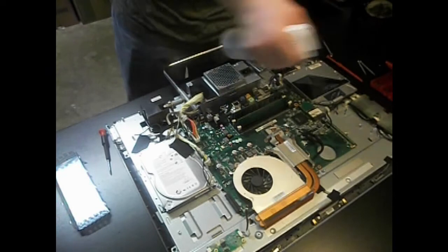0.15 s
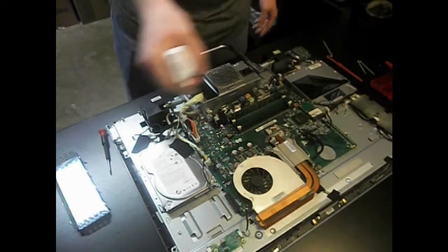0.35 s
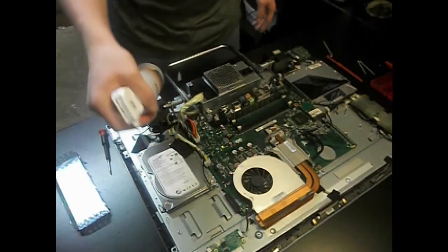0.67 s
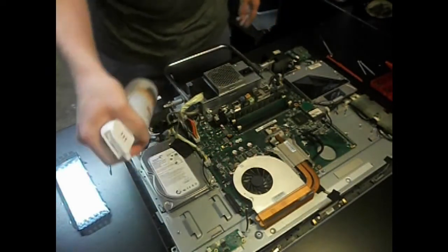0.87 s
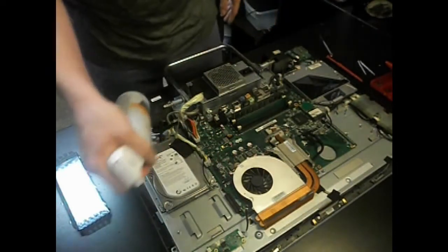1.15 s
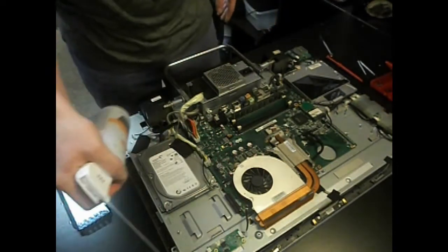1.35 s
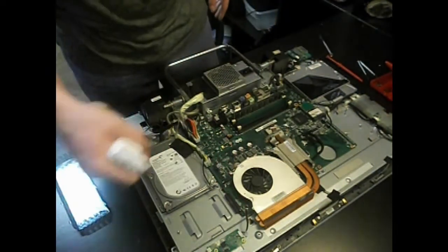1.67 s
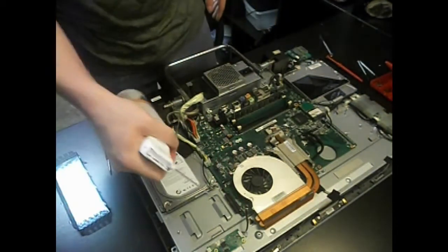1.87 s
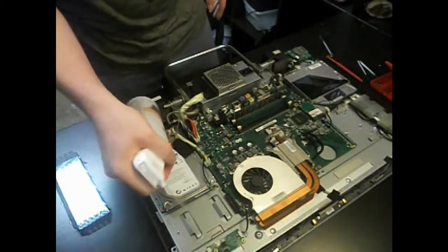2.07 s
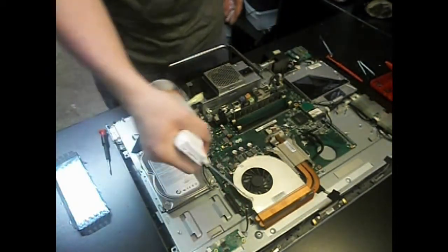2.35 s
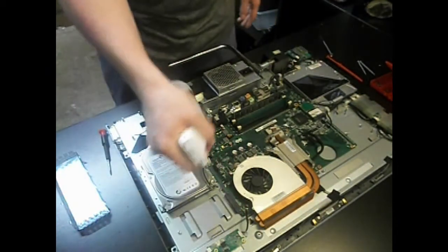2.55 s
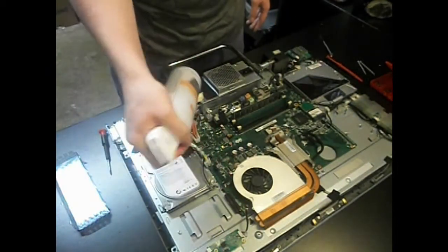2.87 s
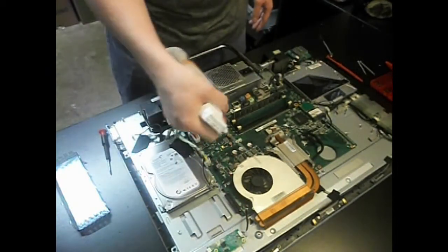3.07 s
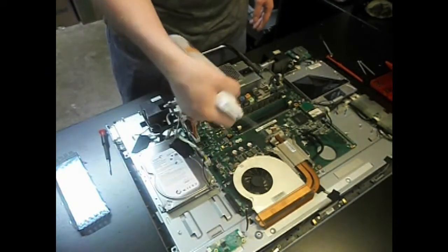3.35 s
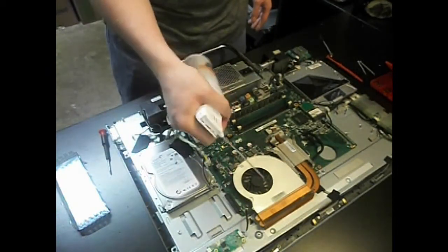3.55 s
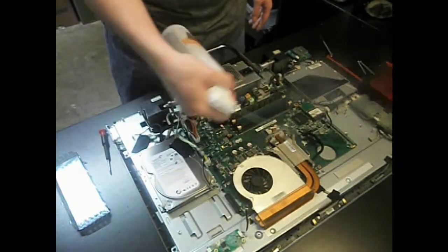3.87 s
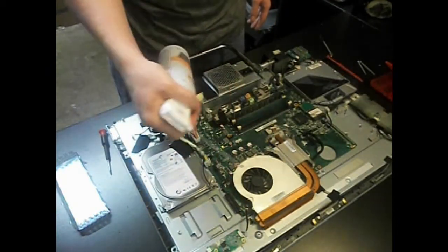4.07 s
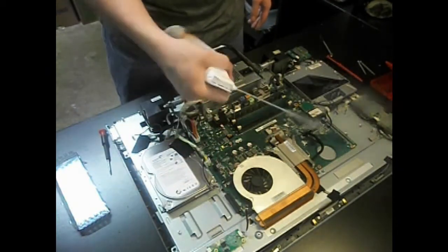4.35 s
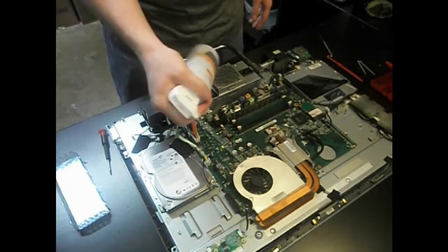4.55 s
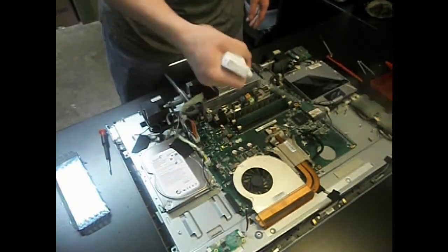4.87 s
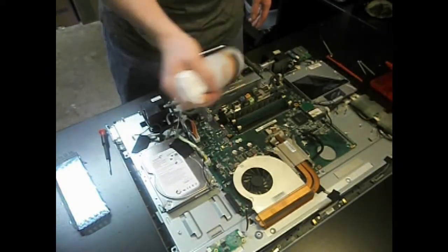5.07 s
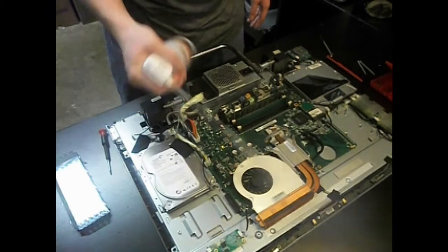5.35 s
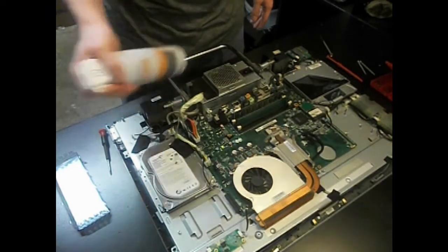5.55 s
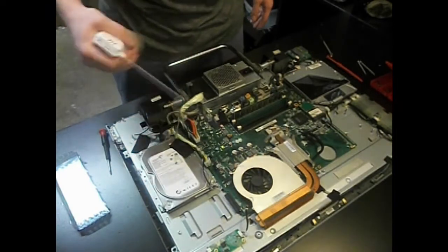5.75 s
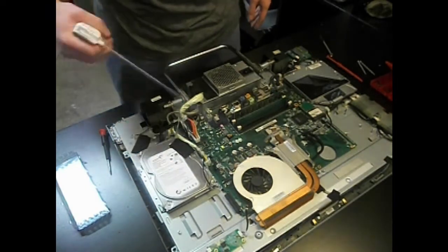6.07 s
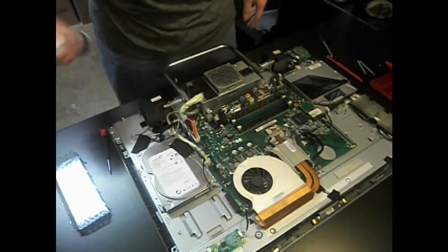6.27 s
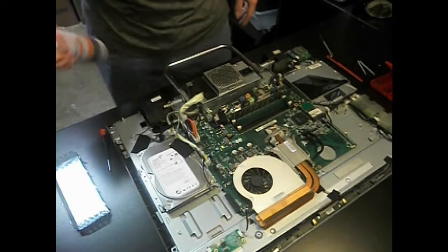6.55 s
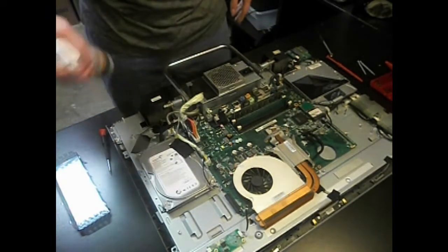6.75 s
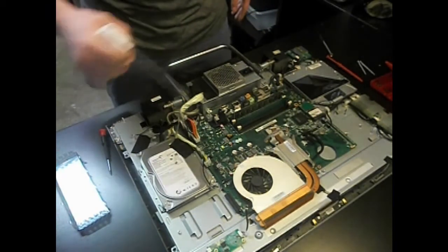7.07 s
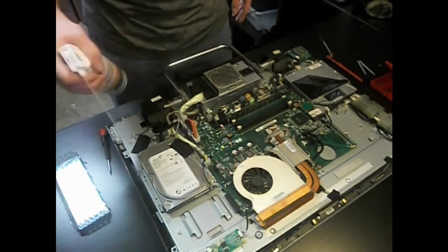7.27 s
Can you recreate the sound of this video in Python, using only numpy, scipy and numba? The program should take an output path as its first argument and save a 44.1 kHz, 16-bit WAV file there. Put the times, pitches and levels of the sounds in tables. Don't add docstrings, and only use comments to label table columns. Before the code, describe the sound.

Indoors, close to a basic camera microphone, an air duster spits abrupt jabs of air, some faint, others harsh and overloaded, with brief quiet room noise between. The jet scrapes over board edges, whistles through slots and buffets thin metal. After a longer puff it opens into a continuous, softer, fluttering hiss that rises and falls to the end, with a few light knocks late on.

```python
import sys
import numpy as np
from scipy import signal
from scipy.fft import rfft, irfft
from scipy.io import wavfile
from scipy.ndimage import uniform_filter1d
from numba import njit

SR = 44100
rng = np.random.default_rng(int(sys.argv[2]) if len(sys.argv) > 2 else 0)


def wrap_up_sound(samples):
    columns = np.atleast_2d(samples).T
    tamed = np.clip(columns, -1, 1)
    steps = np.round(tamed * 32767).astype(np.int16)
    wavfile.write(sys.argv[1], SR, steps)


def rack_gain(trim_db):
    fader = np.asarray(trim_db, float)
    return 10 ** (fader / 20)


N = 327222
HZ = np.fft.rfftfreq(N, 1 / SR)
MS = np.arange(N * 1000 // SR + 2) / 1000


def unit(x):
    return x / np.sqrt(np.mean(x ** 2))


def bump(hz, width_hz, db):
    return rack_gain(db / (1 + (2 * (HZ - hz) / width_hz) ** 2))


def coloured(points, body=1):
    hz, db = np.transpose(points)
    gain = rack_gain(np.interp(np.log(HZ + 1), np.log(hz), db))
    return unit(irfft(rfft(rng.standard_normal(N)) * gain * body, N))


def walk(rate_hz):
    hold = int(SR / rate_hz)
    steps = np.repeat(rng.standard_normal(N // hold + 1), hold)
    return unit(uniform_filter1d(uniform_filter1d(steps, hold), hold)[:N])


def patchy(x, edges_hz, rate_hz, patchy_db):
    spectrum = rfft(x)
    band = np.searchsorted(edges_hz, HZ)
    out = np.zeros(N)
    for k in range(len(edges_hz) + 1):
        out += rack_gain(patchy_db * walk(rate_hz)) * irfft(spectrum * (band == k), N)
    return out


@njit
def svf(x, hz, q):
    y, band, low = np.empty(len(x)), 0., 0.
    for i in range(len(x)):
        g = np.tan(np.pi * hz[i] / SR)
        v = (band + g * (x[i] - low)) / (1 + g * (g + 1 / q))
        band, low, y[i] = 2 * v - band, low + 2 * g * v, v / q
    return y


def smooth(control):
    return np.interp(np.arange(N) / SR, MS, control)


def pull(rows, attack_s):
    full, held, first, last, fade = np.transpose(rows)[:, :, None]
    db = first + (last - first) * np.clip((MS - full) / np.maximum(held, 0.005), 0, 1)
    db = db - 40 * (np.maximum(full - MS, 0) / attack_s) ** 1.3
    db = db - fade * np.maximum(MS - full - held, 0)
    return np.sum(rack_gain(2 * db), axis=0)


def crossing(rows):
    middle, length = np.transpose(rows)[:2, :, None]
    return np.exp(-np.abs(2 * (MS - middle) / length) ** 3.05)


def extra(rows):
    return np.transpose(rows)[2] @ crossing(rows)


def valve_flow():
    # full_s, held_s, first_db, release_db, fade_db_per_s
    puff_rows = [
        (-.01, 0.057, -26, -30.5, 480),
        (.205, .075, -33, -29.5, 500),
        (.775, 0.081, -16, -18.5, 320),
        (1.08, .11, -16.5, -21, 600),
        (2.318, .1, -12.5, -14, 300),
        (2.685, 0.099, -11, -17, 362),
        (3.03, 0.23, -16, -18, 280),
    ]
    # full_s, held_s, first_db, release_db, fade_db_per_s
    snap_rows = [
        (.478, 0.091, -15.5, -16.5, 620),
        (1.347, 0.094, -16, -19, 520),
        (1.632, 0.085, -13, -10.5, 348),
        (1.95, 0.13, -13.5, -13.5, 389),
        (3.62, 0.087, -15.5, -13.5, 200),
    ]
    # full_s, held_s, first_db, release_db, fade_db_per_s
    swell_rows = [
        (3.74, 0.12, -21.5, -21.5, 450),
        (4.19, 0.18, -21, -19.5, 330),
        (4.77, 0.098, -21.5, -18, 80),
        (5.195, 0.61, -21, -23.5, 500),
        (5.52, 0.28, -26, -25, 280),
        (6.064, 0.093, -25.5, -25, 150),
        (6.2, 0.067, -23, -17.5, 39.6),
        (6.63, 0.26, -24, -24, 100),
        (6.95, .06, -19.5, -19.5, 60),
        (7.36, 0.15, -26, -15.5, 50),
    ]
    # full_s, held_s, first_db, release_db, fade_db_per_s
    held_rows = [
        (3.4, 0.2, -51.5, -56, 100),
        (3.89, 0.37, -27, -31, 100),
        (4.4, 0.53, -28, -27.5, 100),
        (4.98, 0.178, -28.5, -25, 300),
        (5.87, .11, -39.5, -35.5, 60),
        (6.03, 0.55, -27, -29, 100),
        (6.6, 0.98, -27.5, -30.5, 50),
    ]
    # middle_s, length_s, flow_db
    surge_rows = [ (.478, 0.013, 9), (.494, 0.021, 8), (1.9, 0.0095, 4), (2.065, .025, -3),
                  (2.428, 0.011, 7), (2.565, .008, 8), (3.1, .006, 6), (1.965, 0.026, 1.5),
                  (1.35, .03, 1.5), (5.7, 0.18, -2), (3.69, .03, 2.5), (4.86, .06, -2), (4.4, .03, -3),
                  (6.05, .06, -2), (6.62, .04, -2), (4.28, .1, 1.5), (.543, .02, 2.5), (.807, .018, 3.5),
                  (2.648, 0.014, 7.5), (1.673, 0.0092, 3), (1.377, .012, 1.5), (0.66, .016, 4.5),
                  (1.075, .016, 1.5), (7.28, 0.14, 2.5), (1.44, 0.043, 8), (1.69, 0.013, -3.5),
                  (1.72, 0.015, 1), (2.035, 0.043, 3), (2.335, 0.034, 2.5), (.175, 0.02, 7),
                  (3.0, 0.014, 2), (2.37, 0.019, -4), (2.412, 0.024, 7), (2.48, 0.049, 4.5),
                  (2.69, 0.016, 4), (3, 0.025, 1.5), (3.1, 0.06, 4), (3.157, 0.042, 7.5),
                  (3.715, 0.024, -6.5), (5.18, 0.022, -5.5), (5.497, 0.03, -5.5), (5.585, 0.022, 1),
                  (.25, 0.064, 3.5), (1.65, 0.046, 2), (6.16, 0.036, -3.5), (6.28, 0.044, -1.5),
                  (6.56, 0.095, -3.5)]
    shut_db = -80
    power = pull(snap_rows, attack_s=0.04) + pull(puff_rows, attack_s=0.06)
    power += pull(swell_rows, attack_s=0.094) + pull(held_rows, attack_s=0.094)
    return 10 * np.log10(power + rack_gain(2 * shut_db)) + extra(surge_rows)


def controls():
    # middle_s, length_s, scrape_db
    edge_rows = [ (.51, 0.083, -9.5), (.83, 0.15, 13.5), (1.125, 0.12, 8), (1.35, 0.094, 7),
                 (1.63, 0.022, -12), (1.8, .12, 12.5), (1.945, 0.15, 9.5), (2.13, 0.12, 10.5),
                 (2.34, 0.055, -6), (2.385, 0.049, 10), (2.5, 0.18, 5), (2.76, 0.23, 7.5),
                 (3.17, 0.26, 4.5), (3.03, .07, 7), (2.9, 0.12, 9), (3.615, 0.04, 12.5), (3.8, 0.16, 5),
                 (4.3, 0.122, 4), (5.22, 0.079, 4.5), (5.66, 0.32, 3), (6.22, 0.11, 2.5), (7.0, 0.11, -2),
                 (7.26, 0.19, 3), (6.56, 0.084, 1), (.25, .1, -0.5), (3.685, 0.025, 8), (4.65, .15, 1),
                 (3.1, 0.023, 7), (3.157, 0.022, 3), (5.4, 0.1, 0.5), (2.69, 0.027, 1)]
    # middle_s, length_s, whoosh_db, pitch_hz
    gap_rows = [ (.03, .1, 6, 1150), (.21, 0.07, 9, 1090), (.52, 0.075, -4.5, 1500), (.83, 0.24, 14, 1900),
                (1.123, 0.096, 19.5, 1140), (1.36, 0.087, 18, 1210), (1.74, 0.11, 7.5, 1400),
                (1.946, 0.12, 14, 1800), (2.14, .08, 17.5, 1400), (2.31, .04, 6, 1240),
                (2.382, 0.042, 16, 1660), (2.5, 0.075, 17, 1500), (2.78, 0.2, -6, 2000),
                (3.039, 0.12, 13, 1330), (3.128, 0.032, 6, 860), (3.27, 0.12, 9, 850),
                (3.619, 0.06, 22, 1187), (3.78, 0.21, 12, 855), (3.98, 0.17, 7.5, 1080),
                (4.26, .18, 10, 900), (4.82, 0.24, 13, 880), (5.2, 0.098, 1.5, 2000), (5.55, 0.12, 8, 980),
                (5.71, 0.29, 12.5, 930), (6.57, .08, -5, 1400), (6.2, 0.067, 6.5, 920),
                (6.3, 0.28, 3, 1520), (4.6, 0.22, 3.5, 1200), (6.88, 0.15, 6, 1130),
                (7.125, 0.078, 10.5, 850), (7.352, 0.066, 3.5, 980)]
    # middle_s, length_s, buffet_db
    panel_rows = [ (.02, .06, 3), (.79, 0.31, 6), (1.13, 0.11, 12.5), (1.63, 0.032, -4), (1.946, .08, 10.5),
                  (2.1, .06, -11), (2.316, .04, 7.5), (2.659, 0.032, 13), (2.86, 0.31, -23),
                  (3.13, 0.093, 18.5), (3.24, 0.15, 17.5), (3.617, .06, 12), (3.78, 0.18, 23),
                  (4.24, 0.15, 25), (4.4, 0.11, 6.5), (1.378, 0.018, 13.5), (4.81, .18, 20),
                  (5.33, 0.15, 7.5), (5.56, 0.11, 10.5), (5.74, 0.25, 11.5), (6.2, 0.081, 11.5),
                  (6.3, 0.29, 7.5), (6.9, 0.11, 5), (7.07, 0.35, 8.5), (6.57, .08, -6), (7.352, 0.086, 9)]
    edge_db, gap_db, panel_db = -12, -12, -13
    panel_top_db, gap_hz = -45.5, 1400
    flow_db = valve_flow()
    buffet_db = -10 * np.log10(rack_gain(-2 * (flow_db + panel_db)) + rack_gain(-2 * panel_top_db)) + extra(panel_rows)
    scrape_db = flow_db + edge_db + extra(edge_rows)
    hollow_db = flow_db + gap_db + extra(gap_rows)
    pitch_hz = gap_hz + (np.transpose(gap_rows)[3] - gap_hz) @ crossing(gap_rows)
    return map(smooth, (flow_db, scrape_db, hollow_db, buffet_db, pitch_hz))


def free_jet(jet_db, eddies_db):
    # hz, level_db per Hz
    jet_spectrum = [(2500, -64), (3400, -35), (4300, -12), (5200, -3.5), (6400, 4), (7300, 4), (8000, 3.5),
                    (8400, -40)]
    hiss = patchy(coloured(jet_spectrum), np.geomspace(5200, 7500, num=5), rate_hz=13, patchy_db=1.13)
    return rack_gain(jet_db + 4.5 + eddies_db + 0.46 * walk(16)) * hiss


def edge_scrape(scrape_db, eddies_db, chassis):
    # hz, level_db per Hz
    scrape_spectrum = [(1500, -27), (2300, -2.5), (2800, -2), (3200, -2), (4200, 1), (5200, -6.5),
                       (7000, -27)]
    rasp = coloured(scrape_spectrum, chassis)
    rasp = patchy(rasp, np.geomspace(2700, 4600, num=4), rate_hz=22, patchy_db=1.5)
    return rack_gain(scrape_db + 0.3 + eddies_db + 0.93 * walk(22)) * rasp


def hollow_whoosh(hollow_db, jet_db, hollow_hz, eddies_db, chassis):
    wake = coloured([(330, -24.5), (700, -1.0), (1100, 2), (2200, -2.5), (2600, 2), (4000, -36.5)], chassis)
    depth = np.clip((hollow_db - jet_db + 9.5) / 16, 0, 1)
    pitched = svf(wake, np.clip(hollow_hz, 300, 4000), 1.17)
    whoosh = (1 - 0.86 * depth) * wake + (0.17 + 0.62 * depth) * pitched
    return rack_gain(hollow_db - 2.0 + eddies_db + 1.52 * walk(25.105)) * whoosh


def panel_buffet(buffet_db):
    # hz, level_db per Hz
    buffet_spectrum = [(60, -38), (130, -11), (220, -4), (310, 1), (365, -7), (420, -0.5), (550, -0.5),
                       (800, -0.5), (1500, -56)]
    return rack_gain(buffet_db + 0.66 + 1.08 * walk(25)) * coloured(buffet_spectrum)


def spray():
    # hz, width_hz, gain_db
    chassis_modes = [(667, 40, 6), (945, 70, 4), (1244, 35, 3), (1726, 45, 4), (1910, 90, 5),
                     (2130, 110, 5), (2320, 100, 4), (2540, 150, -5), (2980, 100, 5), (3440, 90, 5),
                     (3925, 60, 4)]
    jet_db, scrape_db, hollow_db, buffet_db, hollow_hz = controls()
    chassis = np.prod([bump(*mode) for mode in chassis_modes], axis=0)
    force = np.clip((jet_db + 25.0) / 18, 0.15, 1)
    eddies_db = force * (1.5 * walk(35) + 2.73 * walk(260))
    out = free_jet(jet_db, eddies_db) + edge_scrape(scrape_db, eddies_db, chassis)
    out += hollow_whoosh(hollow_db, jet_db, hollow_hz, eddies_db, chassis)
    return out + panel_buffet(buffet_db)


def gusts(duck):
    # middle_s, length_s, drone_db
    draught_rows = [ (.62, 0.23, -9), (1.96, 0.086, 22), (2.29, 0.11, 5), (2.55, 0.12, -8),
                    (2.83, 0.3, -16), (3.16, .3, 2), (3.77, 0.36, 10), (4.22, 0.2, 16), (4.4, .08, 10),
                    (1.378, .03, 12), (6.35, .15, 5.5), (4.66, .14, 15), (4.84, .2, 3), (2.68, .08, 8),
                    (5.55, 0.48, 8), (6.8, 1.4, 5.5)]
    drone_db = smooth(-52 + extra(draught_rows)) + 0.61 * walk(12)
    hum = rack_gain(-53) * coloured([(8, -4.0), (22, -2), (45, -5.0), (70, -16), (200, -50)])
    drone = coloured([(20, -14.5), (45, -7), (65, -6.5), (110, 1), (200, -7), (320, -23.5), (600, -52.0)])
    return duck * hum + rack_gain(drone_db) * drone


def still_room(duck):
    # hz, level_db per Hz
    room_spectrum = [(150, -41.5), (300, 4), (600, 3), (1500, 0), (2500, -0.5), (4000, -6), (6500, -10),
                     (8000, -5), (8400, -36)]
    return duck * rack_gain(-52.5) * coloured(room_spectrum)


def whistles():
    # start_s, end_s, hz, width_hz, level_db
    breath_rows = [(0.432, .462, 7500, 400, -36), (.468, 0.573, 6300, 1500, -11),
                   (1.009, 1.05, 7500, 400, -39), (2.645, 2.709, 950, 250, -28),
                   (2.679, 2.76, 2100, 500, -24.5), (2.68, 2.802, 2870, 400, -27),
                   (1.3, 1.327, 3400, 700, -44), (1.597, 1.615, 3400, 800, -37),
                   (7.335, 7.368, 2350, 200, -31), (7.335, 7.37, 1500, 500, -32),
                   (4.86, 4.912, 1050, 220, -23), (5.88, 6.0, 7500, 350, -36), (4.27, 4.35, 1890, 400, -28),
                   (.78, 0.87, 2130, 120, -20), (.78, 0.874, 3470, 200, -15.5),
                   (0.792, 0.847, 3000, 100, -15.5), (1.103, 1.15, 1070, 250, -20.5),
                   (1.324, 1.443, 1180, 200, -12), (1.34, 1.44, 1960, 300, -14), (1.45, 1.66, 45, 40, -50),
                   (1.669, 1.71, 1140, 200, -20.5), (2.356, 2.419, 1120, 297, -18),
                   (2.357, 2.409, 2010, 400, -16.5), (2.483, 2.519, 1510, 900, -25),
                   (2.682, 2.814, 3770, 600, -20), (3.008, 3.099, 1276, 446, -21),
                   (3.105, 3.303, 680, 100, -30), (3.2, 3.31, 405, 70, -29.5),
                   (3.606, 3.662, 1160, 397, -14.5), (3.72, 3.832, 228, 80, -25.5),
                   (3.923, 3.994, 1140, 300, -33), (4.419, 4.494, 1090, 350, -33.5),
                   (4.748, 4.9, 220, 96, -25.5), (4.766, 4.925, 650, 60, -24.5),
                   (5.186, 5.298, 2210, 250, -31.5), (5.72, 5.803, 783, 250, -32),
                   (6.21, 6.3, 2050, 400, -30), (6.18, 6.24, 700, 300, -29), (2.27, 2.295, 7200, 900, -34)]
    # start_s, level_db
    seat_rows = [
        (.442, -38),
        (.728, -44),
        (1.905, -39),
        (2.622, -41.5),
        (2.98, -45),
        (3.56, -47),
    ]
    seat_s, seat_hz, seat_width_hz = 0.032, 2650, 820
    seats = [(s, s + seat_s, seat_hz, seat_width_hz, db) for s, db in seat_rows]
    out = np.zeros(N)
    for start, end, hz, width, db in [*breath_rows, *seats]:
        a, b = int(start * SR), int(end * SR)
        centre, q = np.full(SR // 2, 1. * hz), 0.69 * hz / width
        breath = svf(svf(rng.standard_normal(SR // 2), centre, q), centre, q)
        breath = breath[SR // 10:SR // 10 + b - a]
        out[a:b] += rack_gain(db) * np.hanning(b - a) ** 0.24 * unit(breath)
    return out


def ticks():
    # start_s, peak_db, ring_hz, ring_s
    tick_rows = [
        (1.298, -44, 2080, 0.092),
        (2.696, -14, 1900, .012),
        (1.598, -29.5, 2220, 0.087),
        (3.586, -25.5, 956, 0.081),
        (7.08, -17.5, 900, 0.055),
        (7.113, -18, 680, 0.048),
        (7.338, -13.5, 910, 0.05),
        (7.338, -18.5, 2325, .04),
        (7.343, -22, 1500, .03),
    ]
    out, t = np.zeros(N + SR), np.arange(SR // 8) / SR
    for s, db, hz, ring_s in tick_rows:
        fade = np.minimum(t / 0.003, 1) * np.exp(-np.log(1000) * t / max(ring_s, 0.005))
        rough = uniform_filter1d(uniform_filter1d(rng.standard_normal(len(t)), size=16), size=16)
        ring = (1 + 2.9 * rough) * np.sin(2 * np.pi * hz * t)
        out[int(s * SR):int(s * SR) + len(t)] += rack_gain(db) * fade * ring
    return out[:N]


def wall_echo(air, tones):
    t60_s, echo_db, tone_send_db = 0.31, -16, -4
    t = np.arange(SR // 2) / SR
    walls = rng.standard_normal(len(t)) * np.exp(-np.log(1000) * t / t60_s) * (t > 0.004)
    walls = signal.lfilter(*signal.butter(1, [1200, 6950], "band", fs=SR), walls)
    walls /= np.sqrt(np.sum(walls ** 2))
    return rack_gain(echo_db) * signal.fftconvolve(air + rack_gain(tone_send_db) * tones, walls)[:N]


def gain_duck(near):
    hold = 1 / (0.25 * SR)
    loud = signal.lfilter([hold], [1, hold - 1], near ** 2)
    return 1 / np.sqrt(1 + loud / rack_gain(-20.5))


def scene():
    air = spray()
    tones = whistles() + ticks()
    near = air + tones
    duck = gain_duck(near)
    return (near + wall_echo(air, tones) + gusts(duck) + still_room(duck))[None]


def top_cut(x):
    return signal.sosfilt(signal.butter(12, 15650, fs=SR, output="sos"), x)


def record(dry):
    # hz, width_hz, gain_db
    port_notch = (8000, 500, -8)
    camera_hz, converter_top_hz, top_hz = 16000, 14300, 15650
    edge = bump(*port_notch) * bump(camera_hz / 2, 20, -30)
    x = signal.resample(irfft(rfft(dry[0]) * edge, N), N * camera_hz // SR)
    x = np.interp(np.arange(N) * camera_hz / SR, np.arange(len(x)), x)
    x = irfft(rfft(x) / np.sqrt(1 + (HZ / converter_top_hz) ** 30), N)
    x = np.clip(x[None], -0.95, 0.95)
    x = signal.sosfilt(signal.ellip(8, 0.2, 60, top_hz, fs=SR, output="sos"), x)
    return top_cut(x)


dry = scene()
out = record(dry)
wrap_up_sound(out)
```